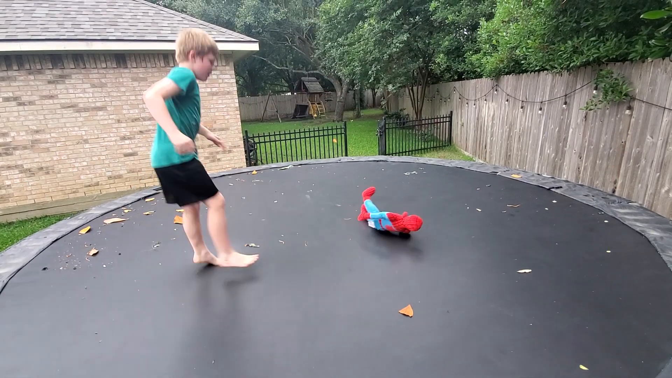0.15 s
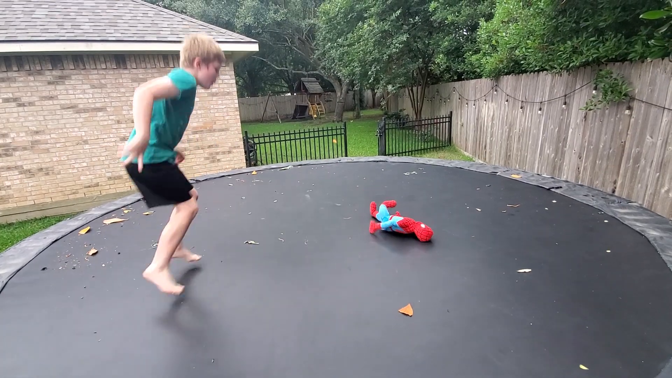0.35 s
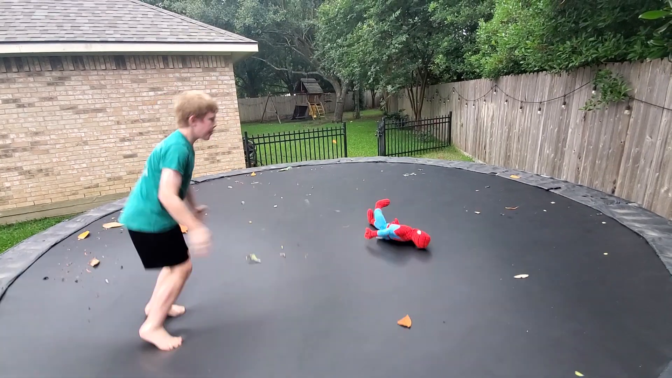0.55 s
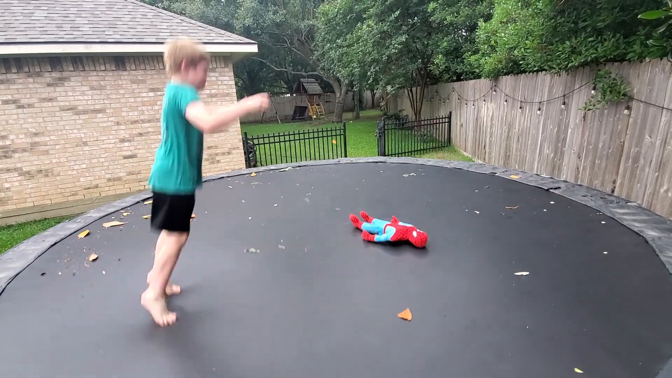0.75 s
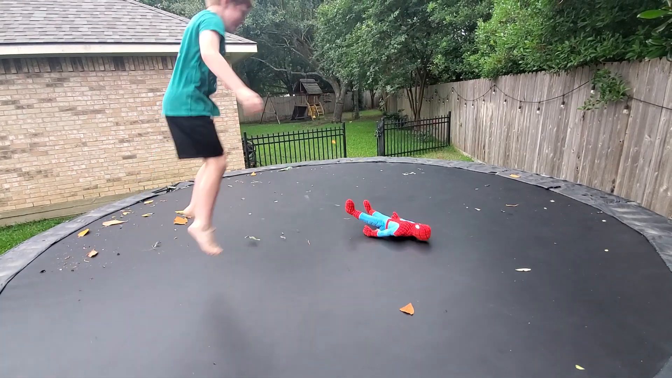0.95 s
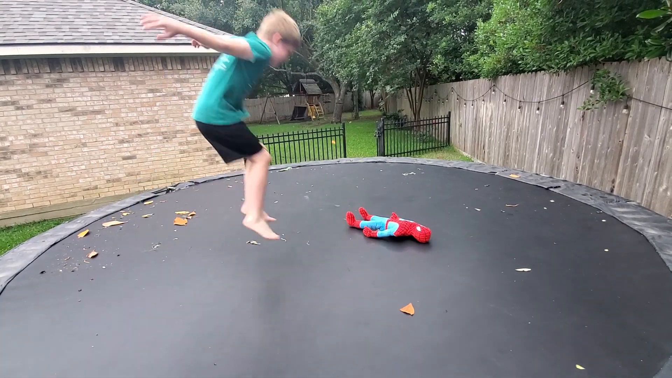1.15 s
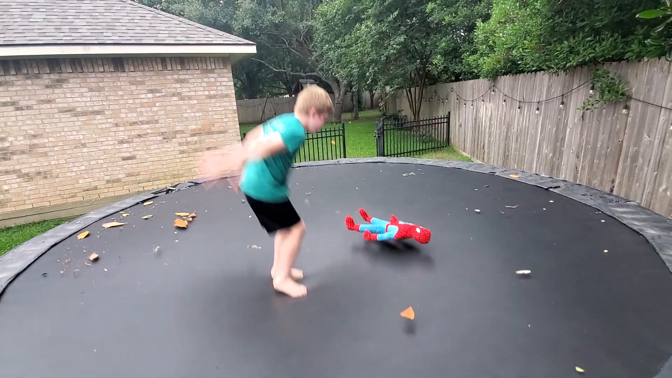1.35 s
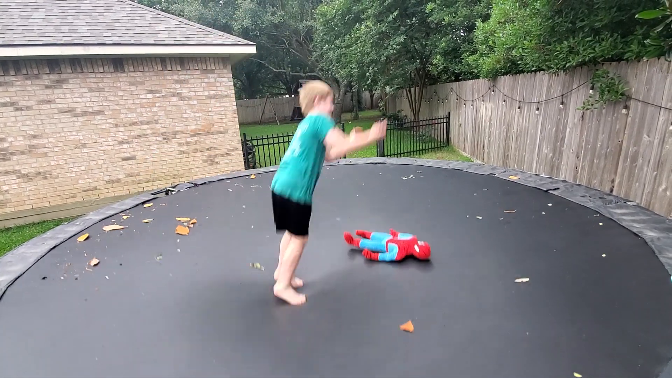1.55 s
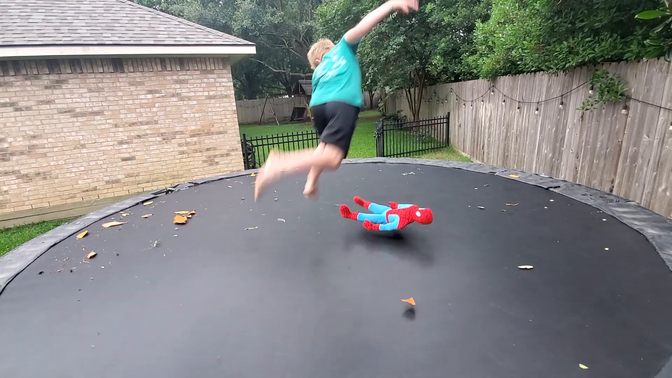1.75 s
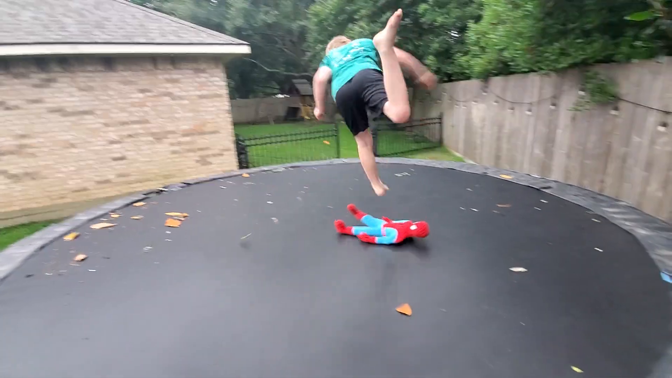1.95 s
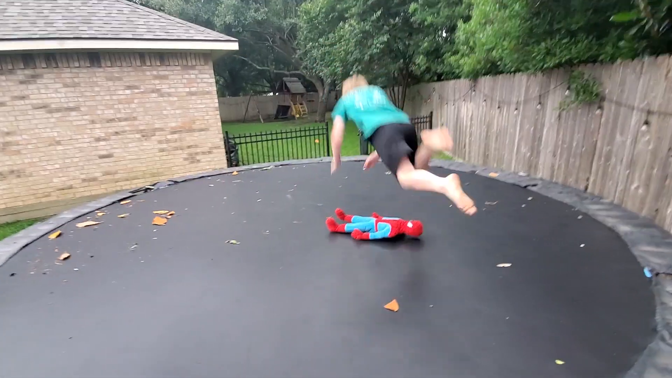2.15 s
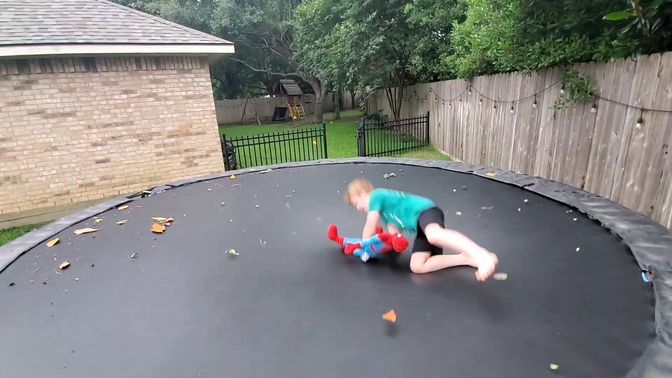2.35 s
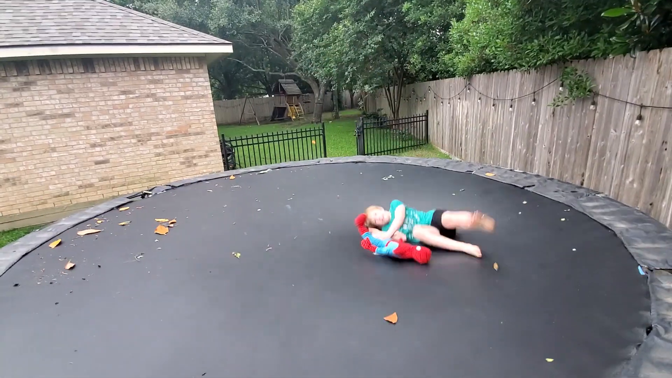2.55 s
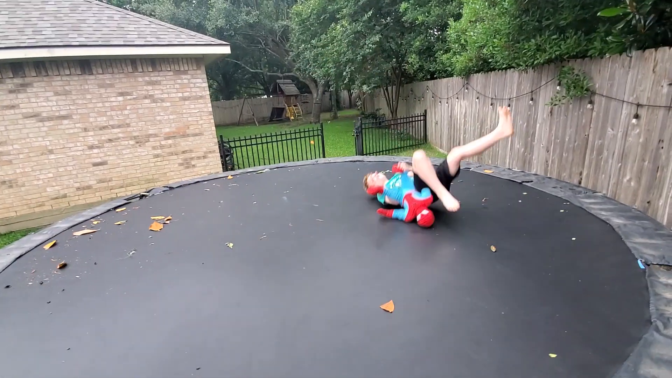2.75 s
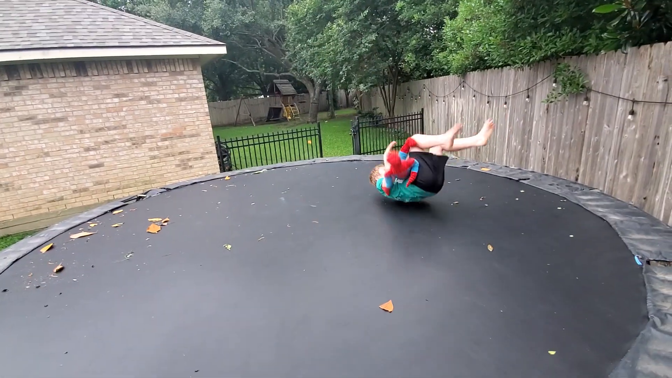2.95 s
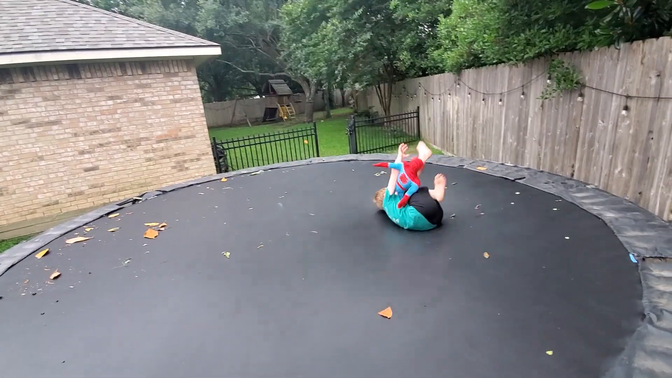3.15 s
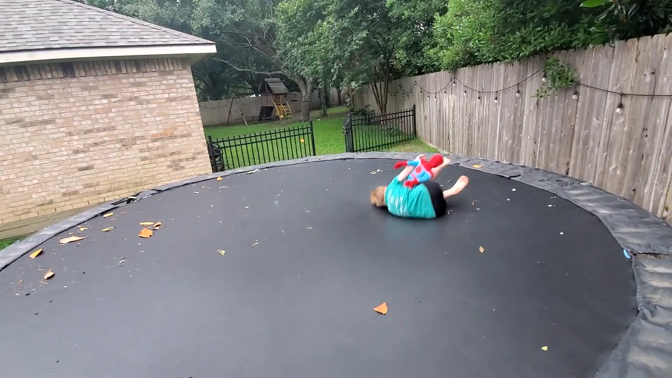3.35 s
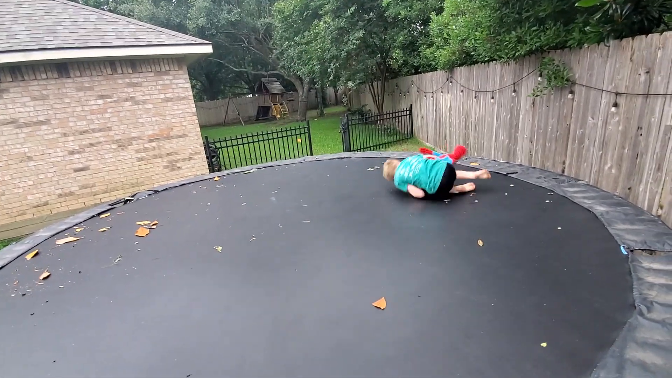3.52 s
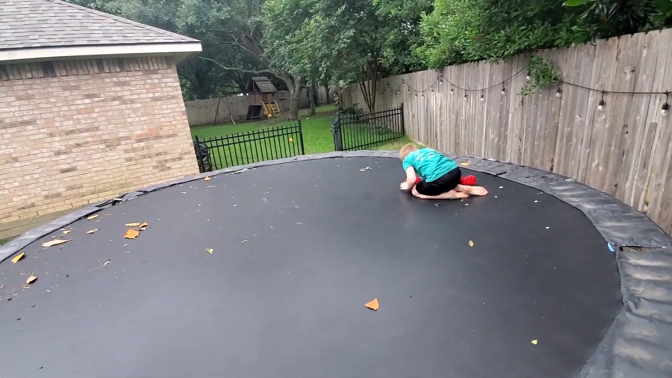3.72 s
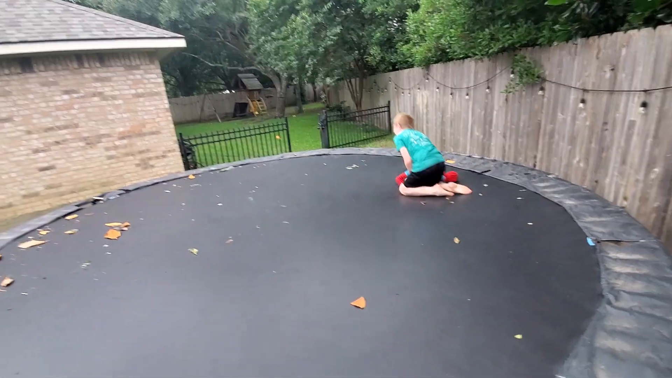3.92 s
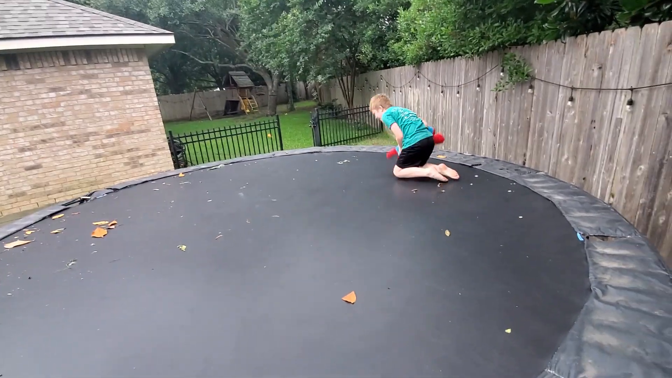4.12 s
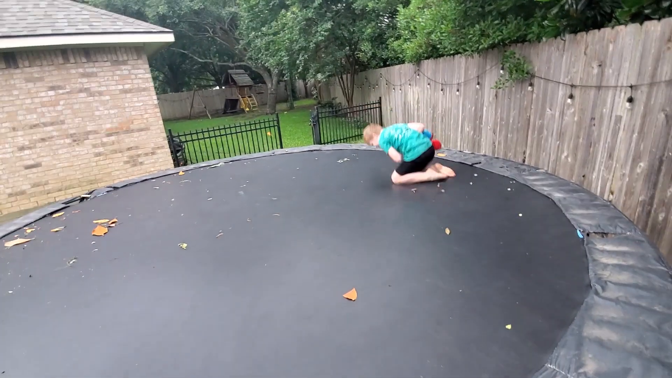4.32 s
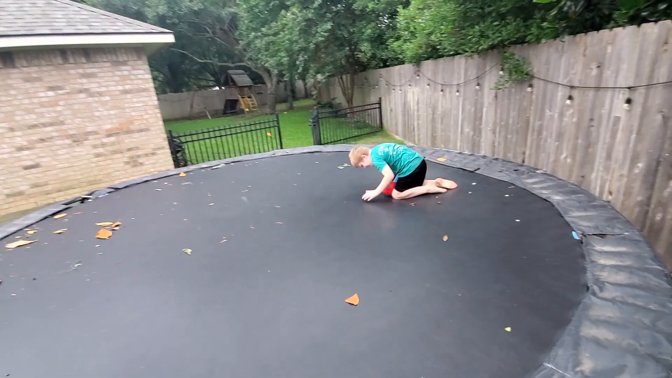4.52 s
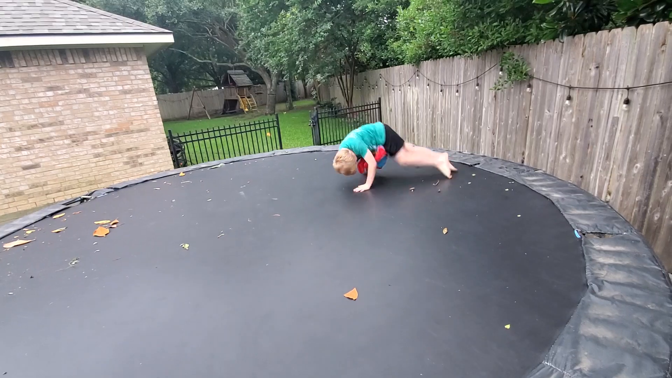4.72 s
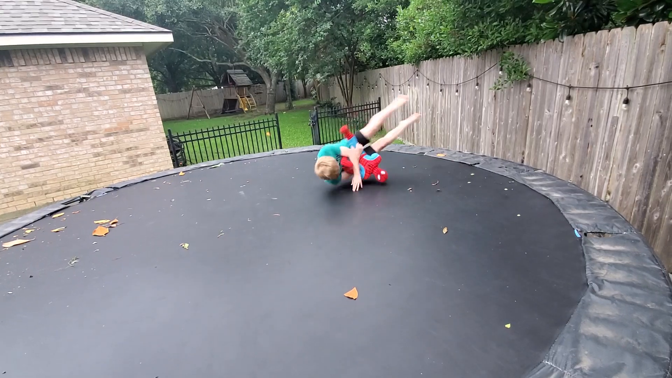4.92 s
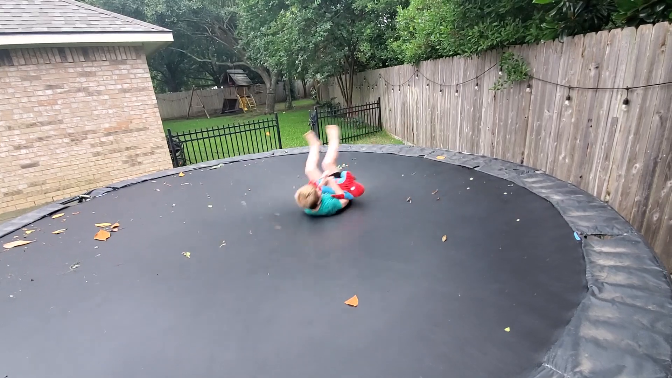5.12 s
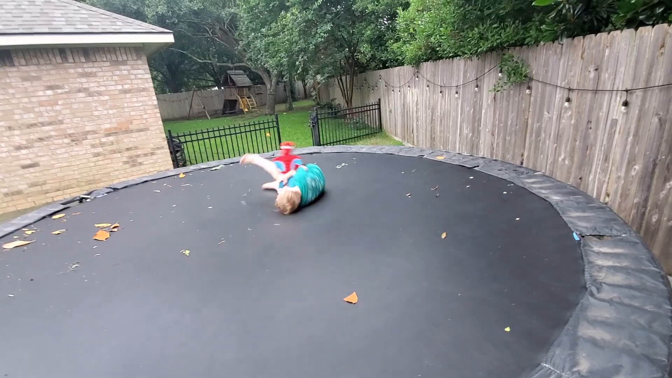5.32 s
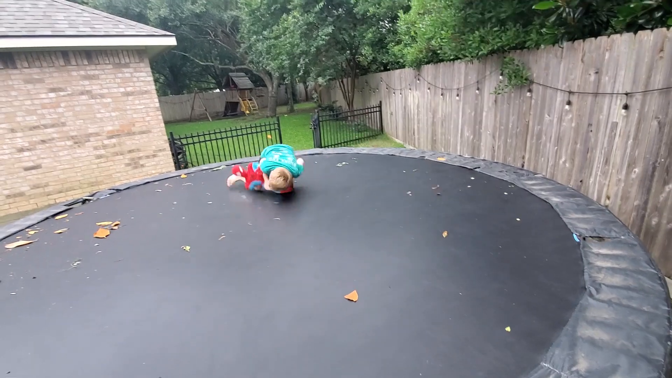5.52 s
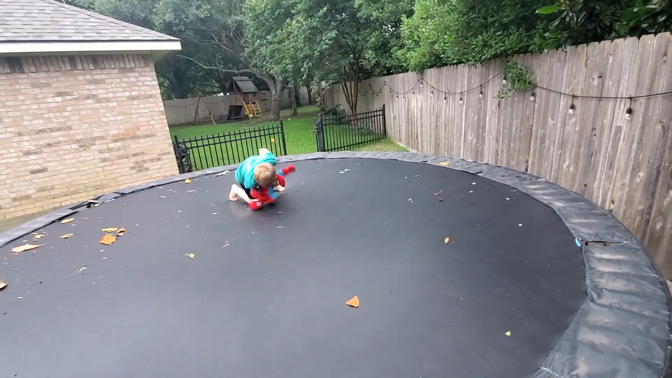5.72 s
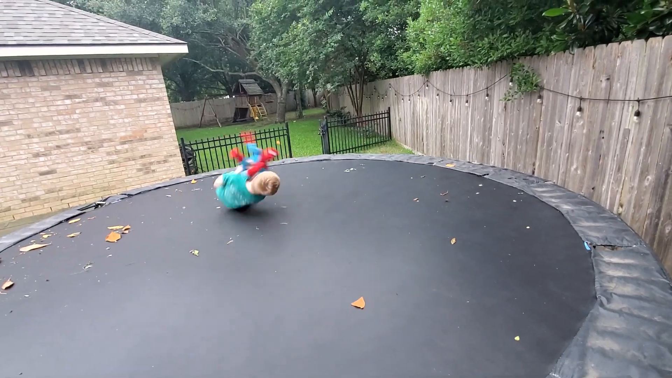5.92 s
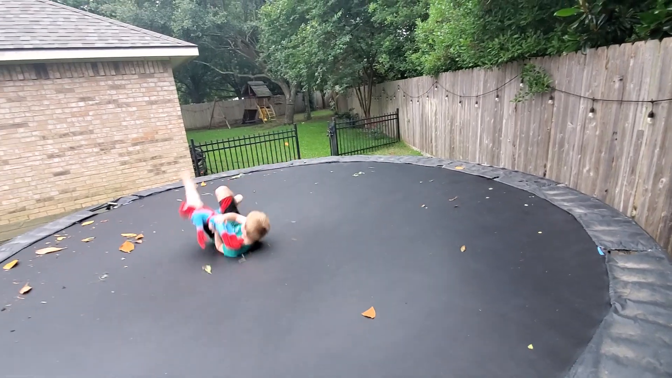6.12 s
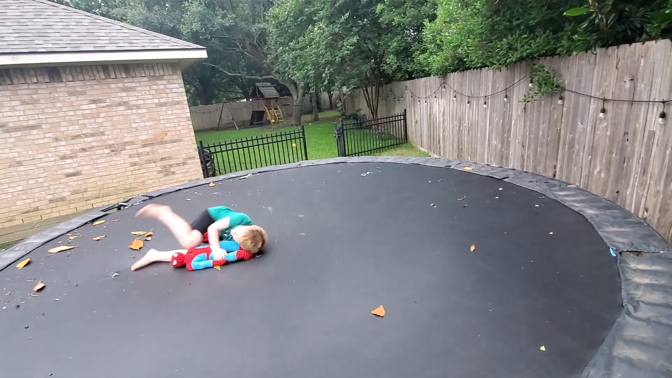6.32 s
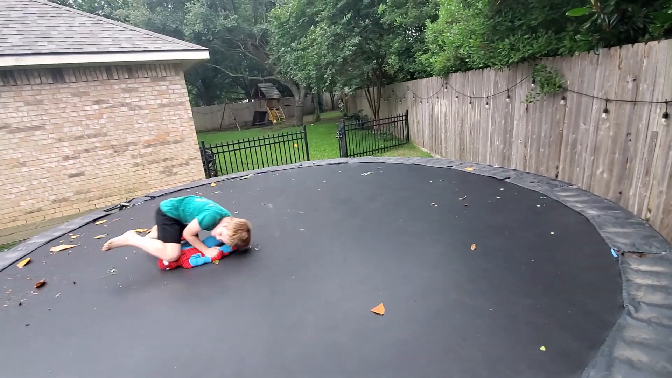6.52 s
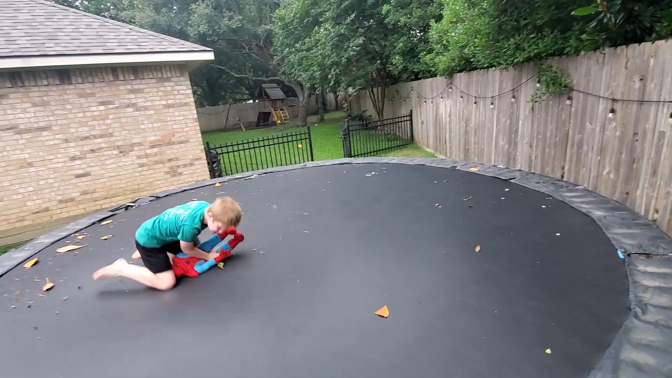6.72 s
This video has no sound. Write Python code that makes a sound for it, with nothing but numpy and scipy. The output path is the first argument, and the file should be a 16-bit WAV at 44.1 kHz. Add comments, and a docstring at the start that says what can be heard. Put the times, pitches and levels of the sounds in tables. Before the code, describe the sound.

A low, steady air-conditioning hum with soft fan noise lies under the whole backyard scene. A child's bounces shake trampoline springs into gritty, bright metallic clatter: a medium burst at once, stronger ones at 0.65 and 1.1 seconds, and the loudest crash at about 1.57, followed by low bumps near 1.7. A lighter rattle at 2.0 leads to a heavy double landing at 2.5-2.6, with dull thuds and deep shudder. A smaller clatter follows at 2.8 and another at 3.3. From 3.5 to 5 seconds rolling brings dry cloth scuffs and soft jingles, with a cluster of clicks and thin squeaks around 4.7-5. Deep soft thumps come near 5.4-5.7, a firmer rattle at 6.0, then more low bumps at 6.3-6.5, rubbing fabric and faint squeaks to the end. Handheld stereo, dry and open.

```python
"""A backyard, beside a trampoline on which a child bounces and rolls; an air-conditioning unit hums nearby.
Each landing shakes the ring of steel springs: gritty clicks clatter and knock ringing modes into sound.
Clicks in soft swells make cloth slide over the mat, unsteady partials make hooks squeak on the frame,
and short damped swings with low noise make the bumps and shudder. Steady tones over broad noise make the
unit's hum. Two microphone ports on a hand-held body pick it all up, the left one later."""
import sys
import numpy as np
from scipy import signal
from scipy.fft import rfft, irfft
from scipy.io import wavfile

SR = 44100
rng = np.random.default_rng(int(sys.argv[2]) if len(sys.argv) > 2 else 0)


def pcm_store(signal):
    """Save signal as 16-bit PCM."""
    levels = np.round(np.clip(np.atleast_2d(signal), -1, 1) * 32767)
    wavfile.write(sys.argv[1], SR, levels.astype(np.int16).T)


N = 302967

# Spring clatter at landings: t/s, peak level/dB of the middle part, dull and sharp parts/dB against the middle
SPRING_CLATTER = [(.0074, -18, -41, -9), (0.363, -40, -3, -7), (.653, -11, -10, -10.5),
                  (0.7668, -30, -3.5, -14), (.9697, -45, -18, -2), (1.1202, -9, -14.5, -8.5),
                  (1.488, -41.5, 3, -22), (1.5685, -0.5, -18, -8), (1.673, -29, -21, -3),
                  (1.981, -26.5, -1, -2), (1.998, -19, -10.5, -11), (2.536, -9, -12, -5.5),
                  (2.5843, -23.5, -19, -7), (2.602, -5.5, -15.5, -4.5), (2.769, -32, 6, 1),
                  (2.82, -17, -21, -11.5), (3.2884, -64, -8, 2), (3.3375, -20.5, -9, -12.5),
                  (3.932, -23.5, -5.5, -17), (4.105, -20.5, -17, -15), (4.29, -41.5, -20, 9.5),
                  (4.595, -29.5, -2.5, -15), (4.7055, -27, -16, -7), (4.7786, -21.5, -6, -8),
                  (4.8244, -30, -19, -11), (4.866, -30, -12, -1), (4.884, -21, -25, -6),
                  (5.2476, -20, -10.5, -16.5), (5.462, -24, 4.5, -5.5), (5.569, -21.5, -33, -8),
                  (6.0343, -12.5, -21, -14.5), (6.2148, -22.5, -4, -7), (6.362, -24.5, 4, -2.5),
                  (6.407, -31.5, -1, -14), (6.586, -22.5, -3, -9), (6.682, -42, -30, -10),
                  (6.7215, -33.5, -2, -11)]
# Steel clatter grains: f/Hz, relative density level/dB per Hz, levelled again in each part
STEEL_SPECTRUM = [(290, -56), (500, -7), (595, -29), (761, -10), (1020, -2), (1110, -4.5), (1600, -3.5),
                  (2610, 0.5), (4280, -23), (6330, -16), (7530, -24.5), (9220, -32), (10700, -32),
                  (16000, -27)]
# Ringing modes of springs and frame: f/Hz, relative level/dB, t60/s (springs() limits it to 0.02-0.12 s)
SPRING_MODES = [(1124, 1, 0.032), (1826, -0.5, 0.048), (2030, -15, 0.066), (2227, -5, 0.14),
                (2390, -3.5, 0.13), (2583, -0.5, 0.058), (2665, -18, 0.073), (2865, 2, 0.036),
                (3015, -13.5, 0.067), (3010, -4, 0.086), (3350, -7, 0.025), (3385, -5.5, 0.051),
                (4490, -10, .08), (5270, -27, .08), (5440, -7.5, 0.13), (5750, -5, 0.11), (6430, -3, 0.097),
                (6190, -9, 0.13), (6300, -12, 0.049), (6800, -32, 0.068)]
# Skin and cloth scuffing over the mat: t/s, held/s (also slows start and end), sharp part level/dB,
# lower parts/dB and bright part/dB against the sharp
MAT_SCUFFS = [(0, 0.03, -42.5, -4, -21), (.67, 0.11, -44, -15.5, -25), (.93, 0.056, -49.5, -8, -24),
              (1.14, .15, -64, -16, -31), (1.2744, 0.0025, -58, -24, 1), (1.565, 0.0088, -34, 0, -2),
              (1.58, 0.071, -42.5, 2, -10), (1.78, 0.014, -50, -6, -10), (1.84, .015, -49, -4.5, -5),
              (1.892, 0.024, -51.5, 0, -4), (1.917, 0.022, -45, -5, -5), (2.2, 0.12, -57, -10, -15),
              (2.3126, 0.003, -73, -21, -8), (2.583, 0.015, -45, -8, 4), (2.6, 0.17, -58, -13, 8),
              (2.749, 0.013, -48, -5, -19), (2.995, .008, -57, 3, -11), (3.252, 0.00086, -58, -21, -16),
              (3.385, .034, -62, 6, -14), (3.571, 0.0055, -50.5, -21, -9), (3.656, 0.031, -46, -1.5, -1.5),
              (3.887, 0.027, -43.5, -3, -7), (4.124, 0.019, -45, -13, -12), (4.39, 0.0061, -50.5, -7, -1.5),
              (4.584, 0.051, -46.5, -8.5, -2), (4.67, 0.071, -46.5, -12, -5.5),
              (4.884, .035, -48.5, -5, -9), (5.25, 0.041, -57.5, -20, 4.5), (5.369, 0.028, -54, -8, 3.5),
              (5.504, 0.014, -56, -7, 2), (5.61, 0.13, -64, 0, -15), (5.739, 0.075, -48, -13, -12),
              (5.57, 0.026, -54, 4, -11), (5.68, 0.035, -55, -25, -9), (5.888, 0.01, -41, -8, -0.5),
              (6.008, 0.039, -48.5, 1, -7), (6.142, 0.066, -46, -2, 1), (6.312, 0.058, -44.5, -2.5, 1),
              (6.393, 0.023, -53.5, -14, -1), (6.483, 0.036, -42.5, -1, -11), (6.55, 0.047, -50, 1, -9)]
# Cloth rustle grains: f/Hz, relative density level/dB per Hz, levelled again in each part
CLOTH_SPECTRUM = [(290, -28), (500, 0.5), (640, -5), (893, -4.5), (1210, -5.5), (1720, -4.5), (2500, -3.5),
                  (3490, -6.5), (4030, -10.5), (7210, -3), (9220, -26), (15100, -21), (16000, -41)]
# Faint stirring of mat and springs throughout: t/s, level/dB
STIRRING = [(0, -49), (.6, -61.5), (1.0, -54), (1.5, -61), (2.2, -55), (3.2, -58), (4.0, -56.5), (4.5, -56),
            (5.0, -56), (5.7, -51.5), (6.0, -55), (6.4, -54), (6.87, -51.5)]
# Colour of the stirring: level/dB of the dull, middle, sharp and bright parts
STIRRING_COLOUR = [-2.5, -2, -5.5, -20]
# Low bumps: t/s, level/dB before a common 3.5 dB lift, f/Hz, t60/s
LOW_BUMPS = [(1.49, -12.5, 114, 0.022), (1.673, -5, 125, 0.016), (1.696, -10.5, 147, 0.0325),
             (1.701, -16.5, 310, 0.029), (2.507, -11, 126, 0.035), (2.611, -25, 77, 0.09),
             (2.633, -12.5, 146, 0.03), (2.716, -20, 200, 0.027), (5.419, -17.5, 68, 0.18),
             (5.464, -17.5, 65, 0.31), (5.48, -17.5, 185, 0.016), (5.511, -19, 320, 0.032),
             (5.611, -28, 67, 0.35), (5.661, -32, 63, 0.28), (6.317, -18.5, 84.4, 0.25),
             (6.362, -15.5, 59, 0.21), (6.376, -28, 240, 0.025), (6.409, -31.5, 364, 0.056),
             (6.532, -21, 63.6, 0.28), (6.552, -28, 330, 0.055)]
# Low shudder after heavy landings: t/s, deep level/dB, upper level/dB (the upper then wavers)
LOW_SHUDDER = [(1.665, -34, -36), (1.689, -36, -33), (2.5, -24, -36), (2.624, -31.5, -24), (5.42, -29, -37),
               (5.467, -26.5, -21), (5.51, -33, -35.5), (5.604, -24, -29.5), (5.65, -42.5, -31),
               (5.72, -39, -44), (6.315, -38, -34), (6.358, -24, -24), (6.405, -29, -29.5),
               (6.534, -28, -26), (6.58, -36.5, -38)]
# Hooks squeaking on the frame, and at 5.6 s a short 720 Hz tone as a bump lands: t/s, length/s, f/Hz, levels/dB
# of partials 1 to 4 before lift and flutter
HOOK_SQUEAKS = [(.07, 0.032, 1100, -49.5, -76, -75, -71), (1.04, 0.17, 1097, -49, -60, -63, -75),
                (1.895, 0.12, 1135, -47.5, -74, -63, -75), (4.277, 0.11, 1512, -54, -40, -56, -56),
                (4.765, 0.06, 1327, -68, -42.5, -70, -70), (4.875, 0.15, 1525, -49, -34.5, -58, -60),
                (5.285, 0.056, 350, -44, -70, -76, -70), (5.56, 0.079, 1536, -68, -38, -70, -73),
                (5.6, .09, 720, -49, -70, -70, -70), (5.755, 0.15, 741, -59, -59, -45.5, -45.5),
                (5.86, 0.032, 750, -63, -50, -57, -63), (6.505, 0.1, 1603, -39, -41, -62, -62),
                (6.67, 0.069, 1500, -50.5, -42.5, -68, -70), (6.82, 0.15, 990, -61, -48, -70, -75)]
# Fan and far air: f/Hz, relative density level/dB per Hz
AIR_SPECTRUM = [(12, -82), (20, -49), (41, -20), (65, -9), (77, -17), (93, -16.5), (172, -21.5),
                (241, -23.5), (293, -28.5), (388, -31), (422, -32.5), (1480, -68), (2820, -43),
                (9670, -81.5), (16000, -63)]
# Compressor tones: f/Hz, mean rms level/dB
COMPRESSOR_TONES = [(60, -31.5), (180, -50.5), (216, -53.5), (309, -63.5)]
# Colour of the microphone ports: f/Hz, level/dB of the left against the right
LEFT_AGAINST_RIGHT = [(60, 0.5), (99, -7), (160, 1.5), (270, -1), (450, 0), (740, 0.5), (1220, -1.5),
                      (2010, -4), (3330, -9), (5500, -7), (9080, -2.5), (15000, -3.5)]
# What the ports hear alike: f/Hz, amplitude share of the shared sound in the left port [0 to 1]
PORT_LIKENESS = [(60, 1), (130, 1), (290, 0.99), (640, 0.31), (1500, 0.71), (4000, 0.17), (12000, 0.24)]
# Delay of the left port: f/Hz, phase lag/rad
LEFT_LAG = [(60, 0.065), (300, 0.48), (1000, 1.65), (2600, 4.54), (7000, 4)]

# Crack and rattle of a landing; bright part in dB against the sharp, rattle in dB against the crack
CLATTER_BRIGHT_DB, CRACK_T60_S, RATTLE_DB, RATTLE_T60_S = -16, 0.04, -14.5, 0.32
# Crack peak over its rms; the nearest coils stir just before it
CREST_DB, LEAD_S, LEAD_DB = 8.5, 0.005, -13.5
# Loose jingle after each clatter; colour is dull, middle, sharp, bright, on top of the clatter's own
JINGLE_DB, JINGLE_T60_S, JINGLE_COLOUR_DB = -25.5, 0.43, [0, -2, 2, -0.5]
# Shortest attack and t60; dull part in dB against the middle
SCUFF_ATTACK_S, SCUFF_T60_S, SCUFF_DULL_DB = 0.0018, 0.079, -7
# s of attack per s held beyond a brief scuff; s of t60 per s held; what counts as brief
SLOW_START, SLOW_END, BRIEF_S = 0.45, 3.96, 0.038
SHUDDER_ATTACK_S, DEEP_T60_S, UPPER_T60_S = 0.003, 0.5, 0.16
AIR_DB, CUTOFF_HZ = -42, 16250


def trampoline():
    """Steel grit under the blows, cloth grains under the sliding; both shake the springs."""
    blows, jingle = clatter()
    sliding = rustle(jingle)
    steel_grit = grains(per_s=9000, spread_db=2.5, spectrum=STEEL_SPECTRUM)
    cloth_grains = grains(per_s=8000, spread_db=-1.0, spectrum=CLOTH_SPECTRUM)
    steel = sum(part * loudness for part, loudness in zip(steel_grit, blows))
    cloth = sum(part * loudness for part, loudness in zip(cloth_grains, sliding))
    ringing = springs(blows + 0.91 * sliding, per_s=820, wander_db=4.0)
    return steel + cloth + amp(-16.5) * ringing


def clatter():
    """Loudness of the four parts: a crack of coils with a dying rattle, and the jingle that outlasts them."""
    before_s = 0.03  # each blow is drawn from a little ahead of its crack
    t = np.arange(SR) / SR - before_s
    after = np.maximum(t, 0)
    rise = (1 - np.exp(-after / 0.0011)) ** 2
    crack = amp(-60 * after / CRACK_T60_S)
    rattle = amp(RATTLE_DB - 60 * after / RATTLE_T60_S)
    lead = amp(LEAD_DB) * np.exp(-np.abs(t) / LEAD_S)
    blow = amp(-CREST_DB) * (rise * (crack + rattle) + lead)
    loose = rise * amp(JINGLE_DB + np.c_[JINGLE_COLOUR_DB] - 60 * after / JINGLE_T60_S)

    blows, jingle = np.zeros((4, N + SR)), np.zeros((4, N + SR))
    for s, peak_db, dull_db, sharp_db in SPRING_CLATTER:
        i = round(s * SR)
        parts = amp(peak_db + np.c_[[dull_db, 0, sharp_db, sharp_db + CLATTER_BRIGHT_DB]])
        blows[:, i:i + SR] += parts * blow
        jingle[:, i:i + SR] += parts * loose
    early = round(before_s * SR)
    return blows[:, early:early + N], jingle[:, early:early + N]


def springs(shaking, per_s, wander_db):
    """Scattered knocks set each mode ringing by itself, more or less strongly from moment to moment."""
    out = np.zeros((2, N))
    for hz, level_db, t60 in SPRING_MODES:
        knocks = rng.standard_normal((2, N)) * (rng.random((2, N)) < per_s / SR)
        drive = shaking[1] if hz < 4000 else shaking[2]  # middle or sharp part
        mode = ring(drive * knocks, hz, np.clip(t60, 0.02, 0.12))
        out += amp(level_db + wander_db * drift(4)) * mode
    return out


def rustle(jingle):
    """Loudness of the four parts of jingle, scuffs and stirring, which come in clumps."""
    out = jingle + amp(in_time(STIRRING)[0] + np.c_[STIRRING_COLOUR])
    for s, held, sharp_db, lower_db, bright_db in MAT_SCUFFS:
        colour_db = np.c_[[lower_db + SCUFF_DULL_DB, lower_db, 0, bright_db]]
        attack = SCUFF_ATTACK_S + SLOW_START * max(held - BRIEF_S, 0)
        out += amp(sharp_db + colour_db) * swell(s, attack, held, SCUFF_T60_S + SLOW_END * held)
    common_db = 1.5 * drift(23.6)
    separate_db = 1.6 * np.array([drift(22) for part in out])
    return out * amp(common_db + separate_db)


def grains(per_s, spread_db, spectrum):
    """Two unrelated streams of uneven clicks, coloured; split into dull, middle, sharp and bright parts."""
    uneven = amp(spread_db * np.minimum(rng.exponential(1, (2, N)), 4))
    sizes = uneven * rng.standard_normal((2, N))
    clicks = sizes * (rng.random((2, N)) < per_s / SR)
    tone = irfft(rfft(clicks) * amp(at_hz(spectrum)), N)
    parts_hz = [(600, 1500), (1500, 4100), (4100, 9000), (9000, 17000)]
    # filtered twice for steeper edges
    return [rms_one(band(band(tone, *edges), *edges)) for edges in parts_hz]


def bumps():
    """Each bump is a short inward push that swings back and dies away, alike in both rows."""
    out, t = np.zeros(N), np.arange(SR // 2) / SR
    onset = 1 - np.exp(-t / 0.0035)
    for s, level_db, hz, t60 in LOW_BUMPS:
        i = round(s * SR)
        push = -np.sin(2 * np.pi * hz * t) * onset * amp(-60 * t / t60)
        out[i:i + len(t)] += amp(level_db + 3.5) * push[:N - i]
    return np.array([out, out])


def shudder():
    """Lumpy low noise while mat and frame settle; the deep part lasts longer."""
    deep = rms_one(band(rng.standard_normal((2, N)), 35, 103.4))
    upper = rms_one(band(rng.standard_normal((2, N)), 150, 480))
    deep_gain = sum(amp(db) * swell(s, SHUDDER_ATTACK_S, 0, DEEP_T60_S) for s, db, _ in LOW_SHUDDER)
    upper_gain = sum(amp(db) * swell(s, SHUDDER_ATTACK_S, 0, UPPER_T60_S) for s, _, db in LOW_SHUDDER)
    return deep_gain * deep + upper_gain * amp(6.0 * drift(25)) * upper


def squeaks():
    """Stick-slip tones: a few partials, slightly unsteady, with a quick start and a fading end."""
    out, waver, flutter = np.zeros(N), drift(27), drift(29)
    for s, length, hz, *partial_db in HOOK_SQUEAKS:
        i = round(s * SR)
        span = slice(i, min(N, i + round(length * SR)))
        u = np.arange(span.stop - i) / (length * SR)  # 0 to 1 through the squeak
        phase = 2 * np.pi * np.cumsum(hz * (1 + 0.0079 * waver[span])) / SR
        tone = sum(amp(db) * np.sin((k + 1) * phase) for k, db in enumerate(partial_db))
        shape = np.sin(np.pi * u ** 0.42) ** 2.8
        out[span] += tone * amp(6.0 + 5.3 * flutter[span]) * shape
    return np.array([out, np.roll(out, 37)])  # second row 37 samples later


def yard():
    """Mains-driven tones that waver a little, over the fan's broad noise."""
    t = np.arange(N) / SR
    tones = np.zeros(N)
    for hz, db in COMPRESSOR_TONES:
        height = np.sqrt(2) * amp(db + 1.04 * drift(2.8))
        tones += height * np.sin(2 * np.pi * hz * t + 0.39 * drift(3.6))
    air = rms_one(irfft(rfft(rng.standard_normal((2, N))) * amp(at_hz(AIR_SPECTRUM)), N))
    return amp(AIR_DB + 2.0 * drift(5.6)) * air + [tones, tones]


def amp(db):
    """Decibels to gain."""
    return 10 ** (np.asarray(db) / 20)


def rms_one(x):
    """Scale to unit rms."""
    return x / np.sqrt(np.mean(x ** 2) + 1e-20)


def in_time(rows):
    """Columns of a (t/s, values) table, one value per sample."""
    s, *columns = np.transpose(rows)
    return [np.interp(np.arange(N) / SR, s, c) for c in columns]


def at_hz(points):
    """A (f/Hz, value) table read at every frequency bin, straight along log frequency."""
    hz = np.maximum(np.fft.rfftfreq(N, 1 / SR), 1)
    table_hz, values = np.array(points).T
    return np.interp(np.log(hz), np.log(table_hz), values)


def drift(rate):
    """Slow random wander of spread about 1, from noise smoothed by a double pole near rate/Hz."""
    step = 40  # samples between drawn points
    r = np.exp(-2 * np.pi * rate * step / SR)
    noise = rng.standard_normal(N // step + 2002)
    slow = signal.lfilter([1], [1, -2 * r, r * r], noise)[2000:]  # the filter's start is dropped
    return np.interp(np.arange(N) / step, np.arange(len(slow)), rms_one(slow))


def band(x, low_hz, high_hz):
    """Band-pass."""
    return signal.sosfilt(signal.butter(2, [low_hz, high_hz], "band", fs=SR, output="sos"), x)


def ring(clicks, hz, t60):
    """A two-pole resonator: a unit click sets a dying sine of height about 1 ringing."""
    r, w = amp(-60 / (t60 * SR)), 2 * np.pi * hz / SR
    return signal.lfilter([0, np.sin(w)], [1, -2 * r * np.cos(w), r * r], clicks + 1e-18)


def swell(s, attack, held, t60):
    """An envelope over all time: rises from s, holds, then dies away."""
    t = np.maximum(np.arange(N) / SR - s, 0)
    return (1 - np.exp(-t / attack)) ** 2 * amp(-60 * np.maximum(t - held, 0) / t60)


def scene():
    """Source row 0 reaches both ports, the left one later; row 1 is what only the left port catches."""
    shared, own = rfft(trampoline() + squeaks() + bumps() + shudder() + yard())
    alike = np.clip(at_hz(PORT_LIKENESS), 0, 1)
    late = np.exp(-1j * at_hz(LEFT_LAG))
    left = alike * late * shared + np.sqrt(1 - alike ** 2) * own
    return irfft(np.array([left, shared]), N)


def record(dry):
    """The two ports differ in colour; peaks are clipped and the top is cut."""
    tilt = amp(at_hz(LEFT_AGAINST_RIGHT) / 2)  # half the difference on each port
    ports = irfft(rfft(dry) * [tilt, 1 / tilt], N)
    top_cut = signal.cheby2(24, 90, CUTOFF_HZ, fs=SR, output="sos")
    return signal.sosfilt(top_cut, np.clip(ports, -0.9, 0.9))


dry = scene()
out = record(dry)
pcm_store(out)
```